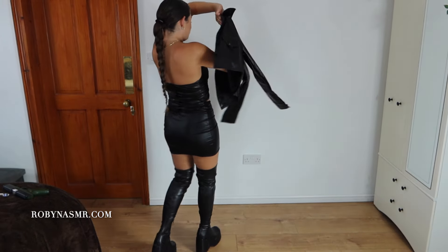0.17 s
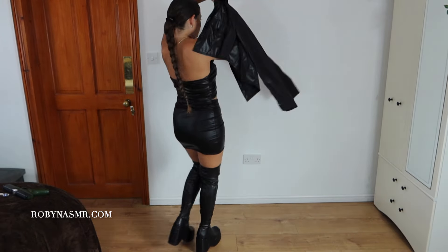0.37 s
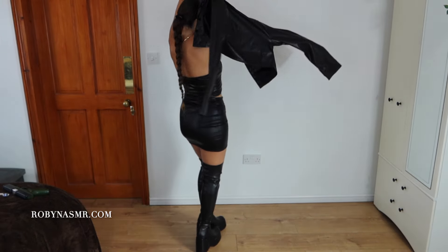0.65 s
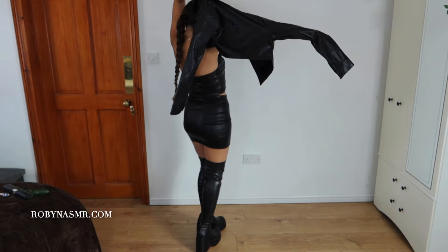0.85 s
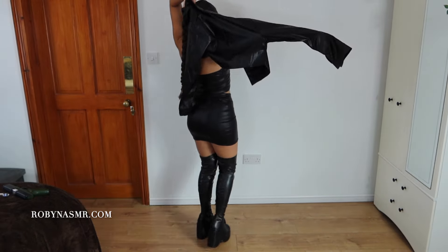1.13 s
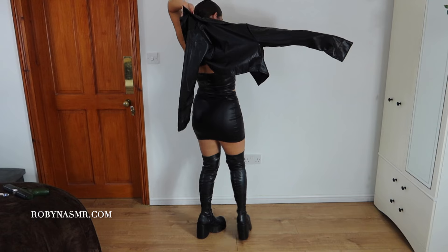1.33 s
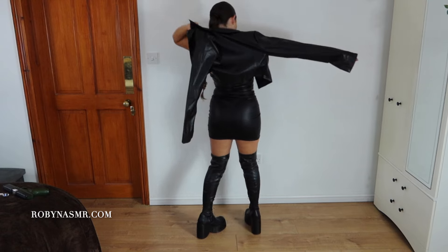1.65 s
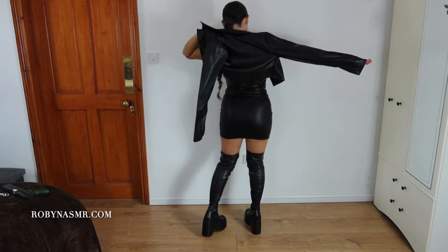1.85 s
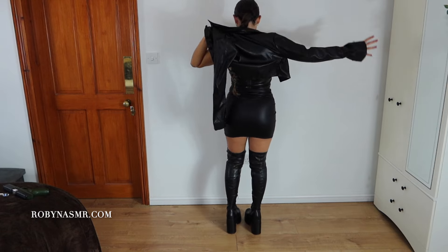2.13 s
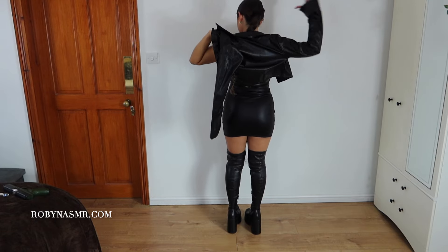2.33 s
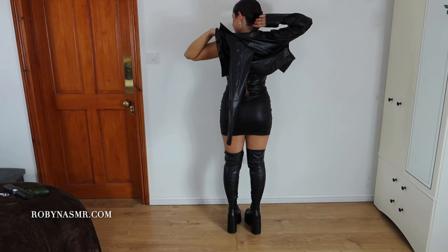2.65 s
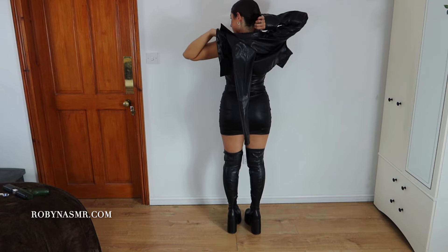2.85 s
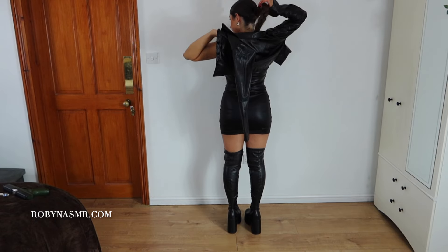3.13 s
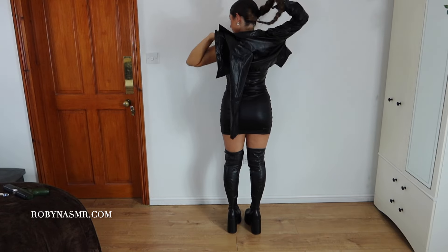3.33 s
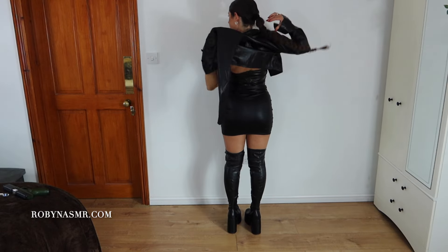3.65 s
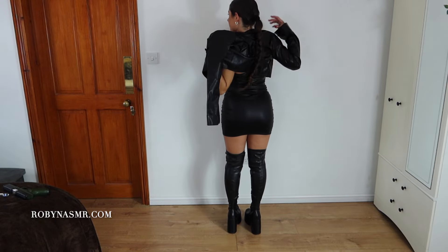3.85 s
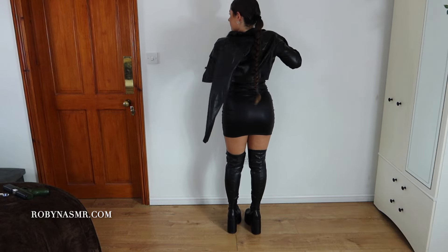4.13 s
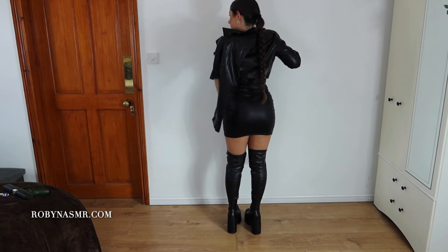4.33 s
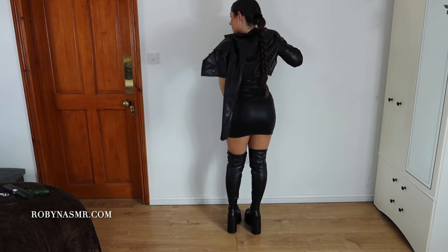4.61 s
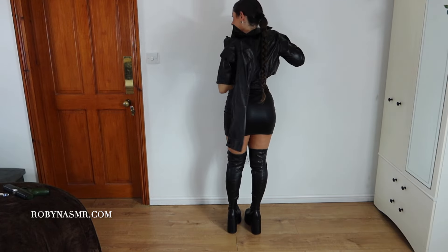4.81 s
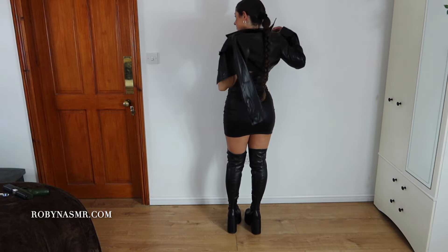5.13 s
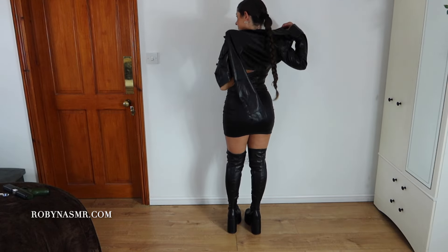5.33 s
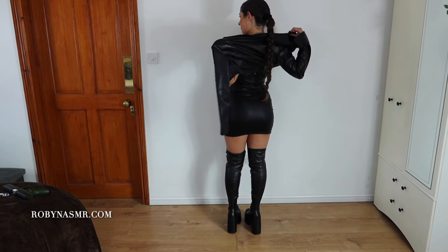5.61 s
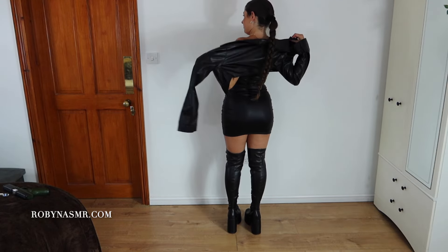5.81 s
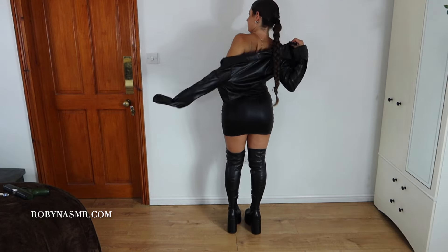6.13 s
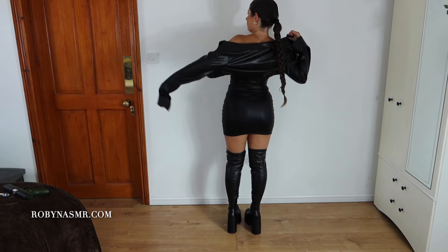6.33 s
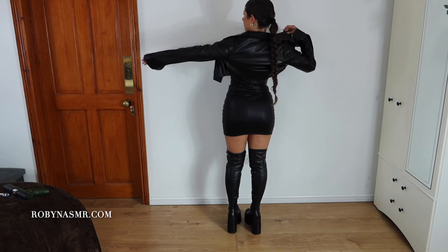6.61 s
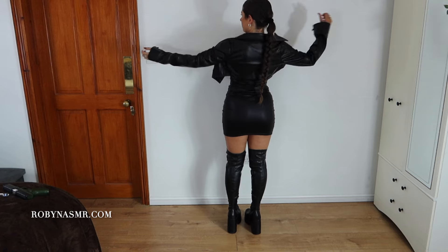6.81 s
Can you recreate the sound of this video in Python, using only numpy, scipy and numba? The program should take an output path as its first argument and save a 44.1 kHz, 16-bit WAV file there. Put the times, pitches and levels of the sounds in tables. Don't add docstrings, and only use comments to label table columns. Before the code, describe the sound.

Leather clothing being put on in a small bright room: a swing of air, slippery lining rustle, creaking folds and loose slaps, mixed with four spaced boot thuds on low-booming boards. After a softer pause the steps are gone and the hide crumples more busily, with clusters of dry pops, a strong sleeve rush, then brighter crackles dying down. Heard from a few metres away, with short reverberation.

```python
import sys
import numpy as np
from scipy import signal
from scipy.fft import rfft, irfft, next_fast_len
from scipy.io import wavfile
from scipy.ndimage import uniform_filter1d
from numba import njit

SR = 44100
rng = np.random.default_rng(int(sys.argv[2]) if len(sys.argv) > 2 else 0)


def inscribe(sig):
    pcm = np.round(np.clip(np.atleast_2d(sig).T, -1, 1) * 32767)
    wavfile.write(sys.argv[1], SR, pcm.astype(np.int16))


def to_linear_factor(level_db):
    exponent = np.asarray(level_db, float) / 20
    return 10 ** exponent


N = 306847
TIME = np.arange(N) / SR

# f/Hz, spectral level/dB [per Hz]
LINING_SPECTRUM = [(1470, -11), (2500, -5.5), (3630, -5.5), (6810, -3.5), (8730, -5.5), (13000, -12.5),
                   (15200, -15.5), (16000, -22)]
HIDE_SPECTRUM = [(700, -8), (1300, 2.5), (2000, 0.5), (3500, -5), (5000, -10.5), (8000, -38)]
CRUMPLE_SPECTRUM = [(80, -29), (170, -5.5), (300, 0), (600, -1.5), (900, -2), (1300, -5.5), (2000, -11.5),
                    (3500, -27)]
FLAP_SPECTRUM = [(15, -23), (30, -2), (50, -2.5), (90, 1.5), (150, -0.5), (250, -7.5), (500, -18)]
# peak t/s, level/dB, 10 dB rise t/s, 10 dB fall
# t/s, hide over lining/dB
SLIDES = [(0.02, -31, .1, .22, 3), (0.406, -38, .4, .25, 3), (0.544, -41, .3, .06, 1),
          (0.655, -54, .01, .06, 19), (0.741, -38, .06, .04, -9), (0.887, -44, .1, .3, 2),
          (1.006, -34.5, .07, .2, 8), (1.11, -32.5, .25, .11, -1), (1.216, -34.5, .04, .25, 6),
          (1.326, -34, .25, .08, -2), (1.422, -35, .03, .08, 6), (1.622, -37, .4, .07, 2),
          (1.70, -47, .008, .05, 19), (1.744, -42, .06, .25, 0), (1.814, -48, .1, .14, 11),
          (2.012, -40.5, .2, .17, 3), (2.18, -38, .05, .14, 6), (2.45, -43, .3, .4, 6),
          (2.55, -41, .4, .1, 5), (2.616, -50, .006, .04, 19), (2.95, -41, .25, .3, 6),
          (3.028, -35, .17, .25, -1), (3.178, -33.5, .25, .12, 4),
          (3.52, -37, .2, .4, 5), (3.71, -34, .35, .16, 5), (3.86, -34.5, .2, .13, 7),
                        (3.99, -38.5, .2, .3, 0), (4.32, -36, .5, .25, 2), (4.5, -32.5, .1, .11, 5),
                        (4.646, -32, .05, .35, 3), (4.932, -38, .15, .06, 2), (5.108, -29.5, .1, .25, 2),
                        (5.43, -32, .22, .17, 5), (5.6, -30, .15, .3, 5), (5.742, -25.5, .2, .3, 1),
                        (5.844, -21.5, .09, .055, -1), (5.988, -30, .3, .3, 0), (6.142, -25, .25, .17, 4),
                        (6.412, -30.5, .2, .4, 1), (6.56, -29, .3, .25, 5), (6.85, -34, .4, .8, 2)]
# peak t/s, level/dB, 10 dB rise t/s, 10 dB fall t/s,
# fold resonance f/Hz
CREASES = [(0.036, -31, .035, .12, 580), (0.21, -41, .1, .2, 880), (0.43, -37, .25, .5, 900),
           (0.57, -38, .3, .12, 600), (0.741, -35, .12, .06, 424),
           (1.006, -28.5, .06, .2, 400), (1.11, -23, .15, .05, 694),
           (1.216, -29, .012, .2, 380), (1.422, -33, .1, .07, 700), (1.63, -33, .15, .2, 330),
           (1.71, -35, .04, .05, 815), (1.814, -35, .09, .1, 586), (2.012, -39.5, .2, .4, 883),
           (2.19, -38, .1, .35, 440), (2.42, -42, .3, .5, 1020), (2.614, -32, .008, .05, 700),
           (2.98, -37.5, .35, .3, 1080), (3.178, -35, .18, .12, 1060),
           (3.52, -29.5, .11, .5, 760), (3.71, -27.5, .3, .08, 820),
                         (3.84, -31, .2, .25, 1070), (4.15, -27, .3, .2, 800), (4.35, -31.5, .2, .3, 620),
                         (4.62, -31, .5, .4, 760), (4.8, -34, .3, .12, 900), (5.108, -28.5, .17, .3, 582),
                         (5.19, -26, .2, .22, 800), (5.42, -29.5, .1, .2, 900),
                         (5.698, -22.5, .19, .1, 900), (5.844, -19, .05, .035, 708),
                         (5.79, -29, .2, .3, 850), (6.0, -29.5, .2, .5, 850), (6.17, -31.5, .4, .4, 1100),
                         (6.32, -32.5, .2, .2, 681), (6.508, -26, .1, .08, 1030), (6.75, -35, .5, .6, 900)]
# peak t/s, level/dB, 10 dB rise t/s, 10 dB fall t/s
SWINGS = [(0.01, -27, .1, .24), (0.783, -42, .1, .2), (0.95, -32, .06, .17), (1.65, -33, .12, .05),
          (1.8, -41, .25, .11), (2.26, -40, .07, .06), (1.2, -41, .3, .5), (3.5, -47, .2, .6),
          (4.102, -40, .17, .5), (4.68, -41, .3, .4), (5.08, -38, .3, .25), (5.888, -39, .07, .05),
          (6.1, -48, .3, .5), (6.508, -42, .12, .07)]
AT_REST_DB = -52, -54, -50, -48
# t/s, peak level/dB, f/Hz, rasp share/dB, shake t/ms
POPS = [(1.006, -20, 500, -9, 6), (1.021, -18, 550, -9, 7), (1.039, -18, 400, -6, 8),
        (1.059, -15, 450, -6, 8), (1.082, -19, 600, -5, 6), (1.102, -11, 696, -18, 14),
        (1.122, -21, 620, -10, 8), (1.208, -10, 600, -10, 14), (1.234, -11, 450, -13, 10),
        (1.26, -14, 550, -6, 7), (1.285, -19, 541, -4, 8), (1.318, -18, 480, -6, 12),
        (1.694, -24, 1150, -8, 10), (1.698, -21, 2330, -8, 6), (1.712, -28, 2800, -6, 12),
        (1.807, -22, 401, -9, 5), (2.607, -17.5, 1350, -8, 10),
        (3.426, -23, 550, -9, 6), (3.465, -17, 910, -11, 7), (3.604, -14, 940, -7, 7),
                 (3.684, -16, 900, -4, 8), (3.712, -4, 850, -9, 9), (3.732, -14, 560, -10, 12),
                 (3.748, -16, 700, -6, 8), (3.775, -18, 750, -8, 8), (3.808, -15, 1290, -8, 6),
                 (3.818, -20, 2600, -8, 8), (3.836, -17, 1000, -8, 5), (3.867, -15, 1400, -8, 8),
                 (3.9, -17, 1120, -8, 8), (3.917, -19, 1800, -8, 8), (3.983, -12.5, 800, -18, 7),
                 (4.024, -15.5, 802, -7, 8), (4.083, -20, 900, -10, 6), (4.098, -14, 1000, -14, 8),
                 (4.136, -17, 600, -11, 7), (4.149, -9.5, 870, -18, 11), (4.162, -9.5, 700, -19, 8),
                 (4.18, -12.5, 865, -16, 10), (4.2, -18, 700, -12, 6), (4.31, -15.5, 694, -11, 8),
        (4.481, -14.5, 445, -12, 7), (4.629, -16, 684, -11, 7), (4.659, -16.5, 604, -12, 6),
              (4.876, -17, 400, -14, 8), (4.905, -7, 600, -22, 11), (4.924, -17, 523, -13, 8),
              (4.947, -15, 560, -18, 4), (4.968, -20, 560, -14, 8), (5.065, -17, 406, -15, 12),
              (5.113, -12, 500, -10, 12), (5.149, -6.5, 1000, -12, 9), (5.168, -11, 700, -14, 6),
              (5.175, -10, 420, -18, 8), (5.189, -9.5, 1090, -12, 11), (5.279, -20, 485, -11, 9),
              (5.374, -6.5, 560, -18, 13), (5.42, -16, 950, -7, 10), (5.659, -12, 1290, -8, 7),
              (5.679, -12, 1280, -15, 7), (5.813, -12, 1400, -8, 6), (5.839, -10, 716, -4, 6),
              (5.86, -9, 700, -8, 8), (5.878, -13, 700, -10, 6),
        (6.11, -14, 1800, -6, 7), (6.135, -13, 2200, -6, 7), (6.205, -15, 1500, -6, 8),
             (6.302, -20.5, 476, -13, 6), (6.446, -18, 1150, -8, 8), (6.474, -15, 1300, -8, 8),
             (6.489, -20, 700, -4, 7), (6.505, -17, 2500, -6, 10), (6.55, -18, 2700, -6, 10),
             (6.556, -19, 1300, -6, 7), (6.574, -18, 2200, -6, 7), (6.648, -9.5, 1350, -11, 9),
             (6.664, -17, 1500, -8, 8), (6.69, -18, 1200, -8, 10), (6.731, -16, 1150, -10, 9),
             (6.762, -17.5, 1500, -4, 10), (6.856, -24, 1100, -5, 6), (6.925, -22, 1300, -3, 10)]
# t/s, peak level/dB, rattle f/Hz, top share/dB, rattle share/dB
SLAPS = [(0.7162, -25, 1770, -15, -19), (0.7257, -22, 1750, -12, -15), (0.9692, -22, 4320, -15, -10),
         (0.9924, -19, 2480, -22, -17), (1.039, -15, 2230, -16, -5), (1.058, -14.5, 2750, -18, -6),
         (1.0805, -13, 4200, -17, -8), (1.1056, -13.5, 4160, -15, -11), (1.2082, -4, 2720, -22, -17),
         (1.2615, -14.5, 2950, -13, -7), (1.3185, -16, 4270, -21, -11), (1.4133, -10.5, 3150, 5, -13),
         (1.494, -12.5, 1470, -4, -22), (1.5823, -18, 2270, -11, -12), (1.693, -29, 2330, -24, -9),
         (2.6082, -22, 1300, -30, -6), (3.8738, -17, 1530, -14, -6)]
# t/s, peak level/dB, f/Hz, click share/dB
KNOCKS = [(0.038, -19.5, 322, 4), (0.055, -23.5, 420, -4), (0.644, -17, 342, 1), (0.669, -17.5, 328, -7),
          (1.538, -23, 201.2, 5), (2.1665, -17.5, 300, -14), (2.18, -25, 300, -8), (2.2225, -15, 300, -6),
          (1.612, -23, 300, -12), (2.199, -26, 330, -10), (2.25, -28, 330, -10), (2.277, -27, 330, -10)]
# peak t/s, level/dB, 10 dB rise t/s, 10 dB fall t/s, f/Hz
BOARDS = [(0.002, -17, .01, .009, 109), (0.096, -13, .019, .022, 99), (0.135, -26, .02, .045, 82),
          (0.4, -46, .6, .03, 108), (0.665, -20, .008, .05, 120), (0.705, -14.5, .04, .03, 115),
          (0.75, -24, .015, .075, 84), (0.86, -29, .06, .025, 86), (0.96, -34, .05, .04, 104),
          (1.018, -35, .025, .2, 99), (1.316, -37, .05, .06, 84), (1.45, -44, .12, .06, 99),
          (1.562, -24, .028, .05, 107), (1.588, -16, .035, .018, 101), (1.668, -17.5, .018, .015, 98),
          (1.76, -38, .06, .02, 97), (2.215, -17, .022, .045, 100), (2.288, -19.5, .08, .012, 92),
          (2.418, -50, .2, .055, 110)]
# delay t/ms, level/dB
NEAR_ECHOES = [
    (4.6, -7.5),
    (7.9, -10),
    (12.5, -14.5),
]
# f/Hz, 60 dB decay t/s
ROOM = [(150, 0.48), (400, 0.29), (1000, 0.21), (2500, 0.5), (6000, 0.22), (13000, 0.1)]


def cloth():
    slides = SLIDES
    hide_slides = [(s, db + over, rise, fall) for s, db, rise, fall, over in slides]
    slide, rub = strokes(slides)[0], strokes(hide_slides)[0]
    crease, fold_hz = strokes(CREASES)
    swing = strokes(SWINGS)[0]
    sizes = np.hypot([slide, rub, crease, swing], to_linear_factor(np.array(AT_REST_DB))[:, None])
    lining = level(colour(slips(14000, 0.4, 25, 0.53), LINING_SPECTRUM), 2.05)
    hide = level(colour(slips(5000, 0.8, 22, 2.05), HIDE_SPECTRUM), -.4)
    crumple = level(colour(slips(1800, 0.98, 18, 1.6), CRUMPLE_SPECTRUM), -3.2)
    flap = level(colour(slips(400, 1.8, 9, 2.2), FLAP_SPECTRUM), 0.39)
    crumple = crumple + 0.6 * hollow(crumple, fold_hz, 2.04)
    wandering_hz = 1700 * np.exp(.3 * walk(14))
    hide = .84 * hide + 0.4 * hollow(hide, wandering_hz, 4.1)
    rustle = lining * sizes[0] + hide * sizes[1] + crumple * sizes[2]
    return rustle, flap * sizes[3]


def pops(grit):
    out, ms = np.zeros(N), TIME[:4096] * 1000
    rise_ms, tail_ms, tail_db = .3, 14, -18
    for s, db, hz, rasp_db, shake_ms in POPS:
        shake = np.exp(-(ms / shake_ms) ** 4.0)
        after_shake = to_linear_factor(tail_db) * np.exp(-ms / tail_ms)
        push = burst(grit[0], s, 0.065, front=0) * (shake + after_shake) * (1 - np.exp(-ms / rise_ms))
        push[20] += 4.5
        fold = band(band(push, hz, 480 + .4 * hz), hz, 700 + .6 * hz)
        rasp = band(push, 2020, 1700)
        add(out, s, peak(fold, db - 0.8) + peak(rasp, db + rasp_db - 1.5))
    return out


def slaps(grit):
    out = np.zeros(N)
    for s, db, hz, top_db, rattle_db in SLAPS:
        body_width = min(20000 * to_linear_factor(top_db / 2), 12000)
        body = band(band(burst(grit[1], s, 0.0028, front=1.0), 3000, 3600), 3300, body_width)
        rattle = band(band(burst(grit[2], s, 0.024, front=0.045), hz, 0.45 * hz), hz, 0.55 * hz)
        thump = band(burst(grit[3], s, 0.0019, front=0.49), 580, 750)
        thump_db = db + 4.5 + .6 * rattle_db
        top = band(band(burst(grit[1], s, 0.0012, front=0.46), 8500, 9000), 8500, 12000)
        struck = peak(body, db + 6.0) + peak(rattle, db + rattle_db - .3)
        add(out, s, struck + peak(thump, thump_db) + peak(top, db + top_db - 6.0))
    return out


def knocks(grit):
    out = np.zeros(N)
    for s, db, hz, click_db in KNOCKS:
        wood = band(band(burst(grit[1], s, 0.014, front=0.56), hz, 1.05 * hz), hz, 1.06 * hz)
        thud = band(band(burst(grit[2], s, 0.028, front=.1), 88, 40), 84, 50)
        click = band(burst(grit[3], s, 0.008, front=0.43), 1500, 2500)
        add(out, s, peak(wood, db + 2.0) + peak(click, db + click_db + .7) + peak(thud, db - 3.5))
    return out


def boards():
    size, hz = strokes(BOARDS)
    phase = 2 * np.pi * np.cumsum(hz) / SR
    size = uniform_filter1d(size, 200)
    overtone = to_linear_factor(-15) * to_linear_factor(4.2 * walk(27)) * np.sin(1.5 * phase)
    return np.sqrt(2) * size * (np.sin(phase) + overtone)


def near_echoes(x):
    out = x.copy()
    for ms, db in NEAR_ECHOES:
        add(out, ms / 1000, x * to_linear_factor(db))
    return out


def room(x, gap_s=0.0074):
    t, out, hop = TIME[:16384], np.zeros(N), 4096
    padded = np.pad(x, (hop, 2 * hop))
    swarms = np.array([band(rng.standard_normal(N + 6 * hop), hz, 0.94 * hz) for hz, _ in ROOM])
    fades = np.array([np.exp(-np.log(1000) * t / t60) / np.sqrt(t60) for _, t60 in ROOM])
    fades = fades * (1 - np.exp(-t / gap_s))
    for start in range(0, N + hop, hop):
        tail = np.sum(swarms[:, start:start + len(t)] * fades, axis=0)
        piece = padded[start:start + 2 * hop] * signal.windows.hann(2 * hop, sym=False)
        echo = signal.fftconvolve(piece, tail / np.sqrt(np.sum(tail ** 2)))
        add(out, max(start - hop, 0) / SR + 1e-9, echo[max(hop - start, 0):])
    return out


def slips(rate, scatter_db, flicker_hz, flicker_db):
    when, size, sign = rng.random(N), rng.exponential(size=N), rng.standard_normal(N)
    size_db = scatter_db * np.minimum(size, 4) + flicker_db * walk(flicker_hz)
    return (when < rate / SR) * sign * to_linear_factor(size_db)


def strokes(rows):
    skirt, merge = .25, 3
    grid = np.arange(0, N / SR, .001)
    s, db, rise, fall, last = (c[:, None] for c in np.array(rows)[:, [0, 1, 2, 3, -1]].T)
    away = np.maximum((s - grid) / rise, (grid - s) / fall)
    stroke_db = np.maximum(db - 10 * (away + skirt * away ** 3), -150) - 1e-3 * away
    weight = to_linear_factor(stroke_db) ** merge
    total = weight.sum(axis=0)
    blend = (weight * last).sum(axis=0) / total
    return np.interp(TIME, grid, total ** (1 / merge)), np.interp(TIME, grid, blend)


@njit
def hollow(x, hz, sharp):
    y, b, l = np.empty(len(x)), 0., 0.
    for i in range(len(x)):
        g = np.tan(np.pi * hz[i] / SR)
        v = (b + g * (x[i] - l)) / (1 + g * (g + 1 / sharp))
        b, l, y[i] = 2 * v - b, l + 2 * g * v, v / sharp
    return y


def burst(grit, s, decay_s, front=2.2):
    start = int(s * 100) * 441
    push = grit[start:][:4096] * np.exp(-np.arange(4096) / SR / decay_s)
    push[0] = front * np.sqrt(decay_s * SR)
    return push


def walk(rate):
    k = int(SR / rate)
    return uniform_filter1d(np.repeat(rng.standard_normal(N // k + 1), k), k)[:N]


def band(x, hz, width):
    return signal.lfilter(*signal.iirpeak(min(hz, .45 * SR), hz / width, fs=SR), x)


def colour(x, points):
    hz, db = np.transpose(points)
    size = next_fast_len(len(x))
    grid = np.log(np.arange(size // 2 + 1) * SR / size + 1)
    gain = to_linear_factor(np.interp(grid, np.log(hz), db, -120, -120))
    return irfft(rfft(x, size) * gain, size)[:len(x)]


def level(x, db):
    return x * to_linear_factor(db) / np.sqrt(np.mean(x ** 2))


def peak(x, db):
    return x * to_linear_factor(db) / np.max(np.abs(x))


def add(out, s, sound):
    i = int(s * SR)
    out[i:i + len(sound)] += sound[:len(out) - i]


def scene():
    rustle, flap = cloth()
    grit = rng.standard_normal((4, N + 4096))
    folds, ticks, heels = pops(grit), slaps(grit), knocks(grit)
    walls = room(0.34 * rustle + to_linear_factor(-4) * folds + to_linear_factor(-1.5) * ticks + to_linear_factor(-1.5) * heels)
    contacts = near_echoes(ticks + heels + .6 * folds) + .4 * folds
    mono = 1.046 * rustle + contacts + walls + flap + boards()
    return np.array([mono, mono])


def band_limit(x):
    return signal.sosfilt(signal.butter(12, 16320, fs=SR, output="sos"), x)


def record(dry):
    ceiling = .52
    rounded = ceiling * np.tanh(dry / ceiling)
    top_cut = signal.ellip(8, .2, 60, 15920, fs=SR, output="sos")
    mix = signal.sosfilt(top_cut, rounded)
    return band_limit(mix)


dry = scene()
out = record(dry)
inscribe(out)
```